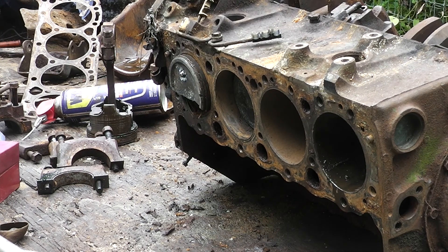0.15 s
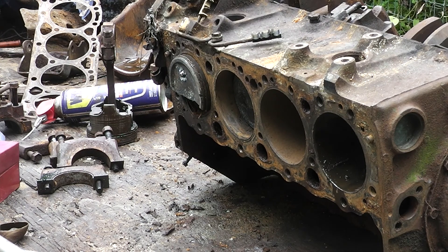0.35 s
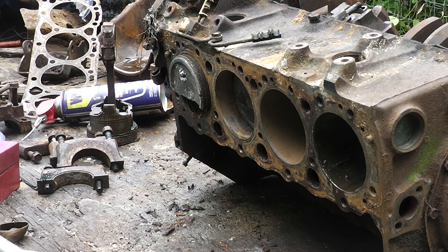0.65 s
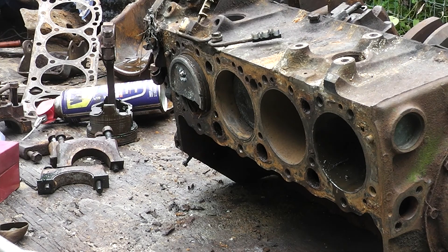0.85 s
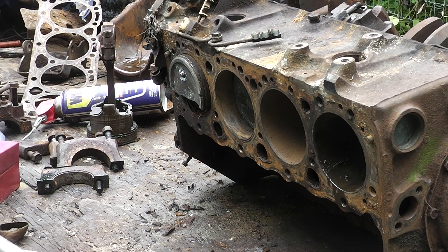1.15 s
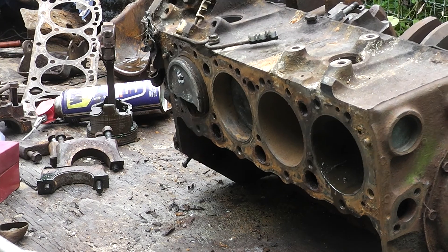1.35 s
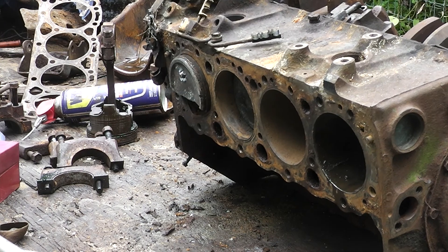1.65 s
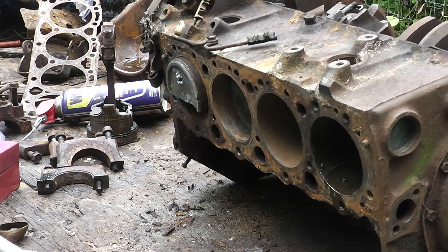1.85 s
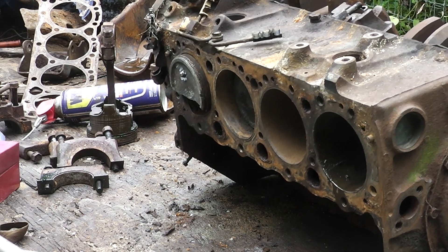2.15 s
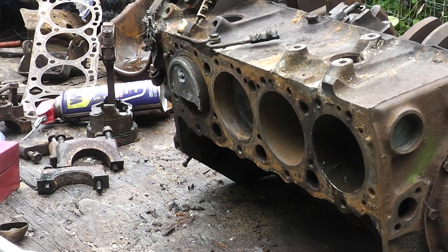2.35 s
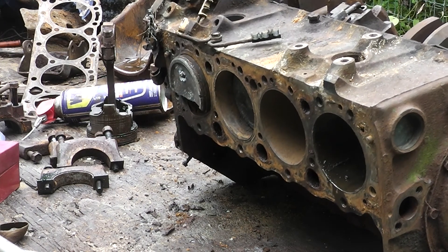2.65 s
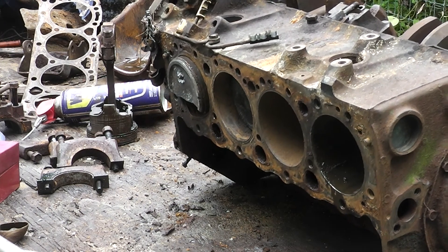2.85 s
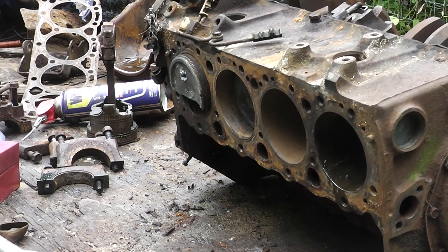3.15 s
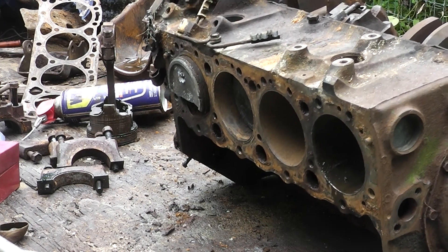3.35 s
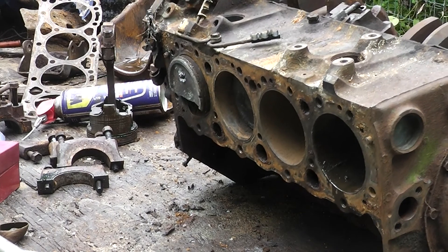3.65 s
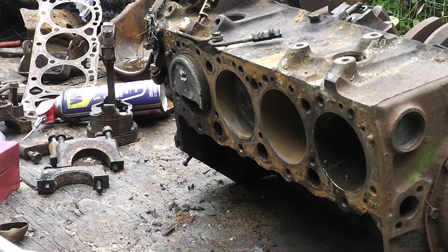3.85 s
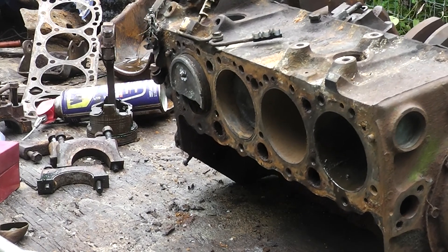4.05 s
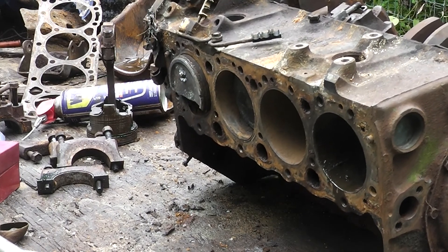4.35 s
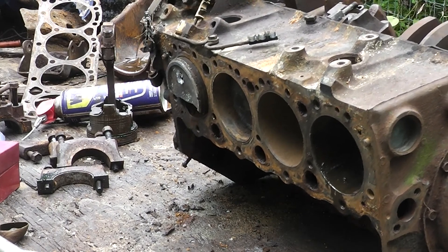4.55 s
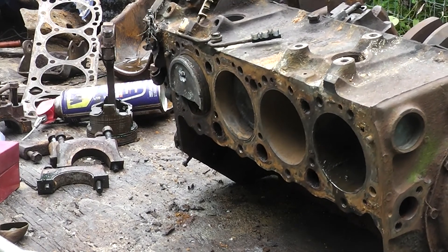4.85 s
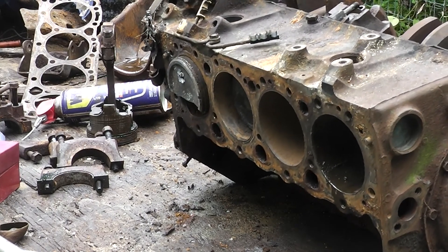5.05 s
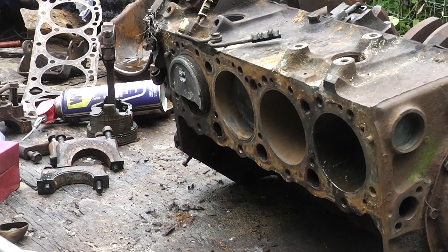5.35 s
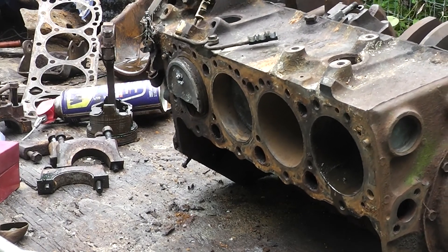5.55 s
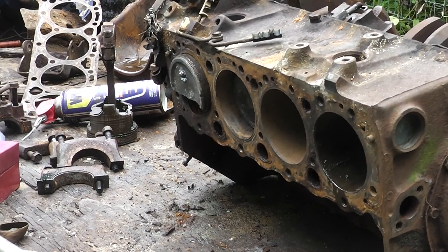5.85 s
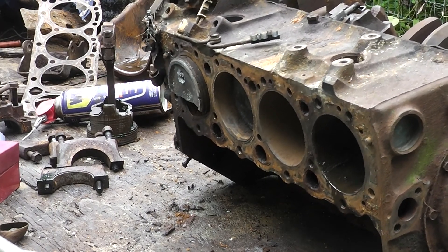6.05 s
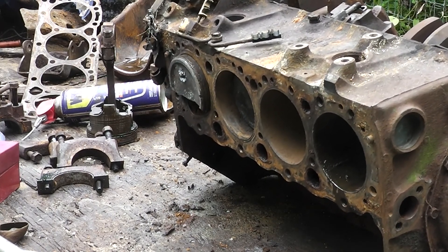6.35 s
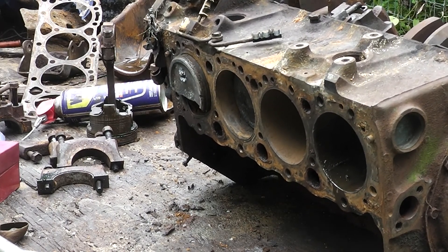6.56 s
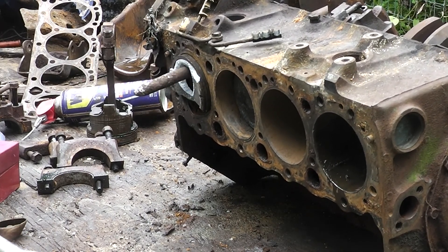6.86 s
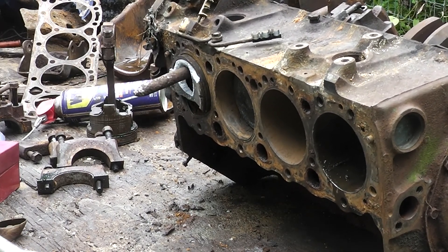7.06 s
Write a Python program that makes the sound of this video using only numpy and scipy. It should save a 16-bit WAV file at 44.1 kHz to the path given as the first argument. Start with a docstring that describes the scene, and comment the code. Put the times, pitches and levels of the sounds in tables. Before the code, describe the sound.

Eleven sharp, ringing hammer blows on a steel bar against a cast-iron engine block outdoors, ending with a freed piece pinging and crashing down.

```python
"""Eleven hammer blows drive a steel bar against a seized piston in a cast-iron engine block outdoors.
Each is a noise crack plus decaying modes of block, piston and bar, convolved with bench scatter and yard echo.
A sleeve rustles first, as noise in short strokes; the bar knocks in the bore, as short noise bursts.
The last blow frees a piece, which pings off a small part (modes) and crashes down (noise bursts and modes).
Gain control ducks the steady outdoor rumble, shaped noise, at every blow and lets it swell back."""
import sys
import numpy as np
from scipy import signal
from scipy.fft import rfft, irfft, next_fast_len
from scipy.io import wavfile
from scipy.ndimage import uniform_filter1d, minimum_filter1d

SR = 44100
rng = np.random.default_rng(int(sys.argv[2]) if len(sys.argv) > 2 else 0)


def output_pcm(signal):
    """Save a mono or channel-first signal as 16-bit PCM at the path in sys.argv[1].

    Samples are clipped to [-1, 1] before scaling.
    """
    pcm = np.clip(np.atleast_2d(signal).T, -1, 1) * 32767
    wavfile.write(sys.argv[1], SR, np.round(pcm).astype(np.int16))


N = 318402
TIME = np.arange(N) / SR   # seconds
AGE = np.arange(int(0.8 * SR)) / SR   # seconds since an onset; every struck sound is cut off at 0.8 s

# Spectra below give relative levels: noise() scales the result to rms 1.
# Outdoor rush. Each row: frequency in Hz, relative density in dB.
AIR_SPECTRUM = [(25, -10.5), (70, -11.5), (120, -14), (300, -11.5), (900, -16.5), (1700, -27.5),
                (2150, -40), (2600, -50), (3400, -52), (4500, -45), (6500, -49), (9600, -49.5),
                (14800, -58.5), (16000, -61.5)]
# Low outdoor drone. Each row: frequency in Hz, relative density in dB.
DRONE_SPECTRUM = [(45, -37.5), (66, -10), (76, -0.5), (86, -15), (110, -49.5), (400, -120)]
RUSH_DB, DRONE_DB = -61.0, -64.5   # rms before the gain control

# Strokes of the sleeve. Each row: start in seconds, length in seconds, level in dB before it eases off.
SLEEVE_STROKES = [(0.177, 0.082, -75.5), (0.366, .04, -87), (0.844, 0.041, -76.5), (0.907, .08, -72.5),
                  (0.995, 0.046, -73)]
STROKE_ATTACK_S, STROKE_SAG_DB_PER_S = 0.014, 49.5
STROKE_RELEASE_DB_PER_S = 201   # added to the sag once the stroke's length is over
# Friction of cloth, of a glancing touch and of grit. Each row: frequency in Hz, relative density in dB.
RUB_SPECTRUM = [(2000, -25.5), (4000, -7), (6000, -1), (10000, -1), (14000, -9), (16000, -18)]

# Hammer blows. Each row: start in seconds, force in dB, gain of the lows in dB, gain of the bar's ring in dB.
HAMMER_BLOWS = [(1.3261, -1.5, 0, -0.5), (1.8116, 0, 2.5, 0), (2.3083, 2, -2.5, -1), (2.851, 0, -0.5, -0.5),
                (3.3824, 1, -1.5, 0), (3.9127, -1, 1.5, 0), (4.4526, 2.5, -2, -1.5),
                (4.9922, 0.5, -2.5, -7), (5.5323, 3.5, -4, -12.5), (6.0808, 4, -5.5, -4),
                (6.645, 0.5, -8.5, -2.5)]
# Cast-iron block. Each row: nominal frequency in Hz, level midway through the blows in dB,
# decay time to -60 dB in seconds, change from first blow to last in dB as the piston works loose.
BLOCK_MODES = [(252, -24.5, 0.059, 2), (293, -33, 0.083, -5.5), (394, -34, 0.23, -1.5),
               (422, -30, 0.083, -0.5), (472, -31, .13, 1.5), (560, -24.5, 0.047, -2),
               (625.5, -25, 0.088, 1.5), (778, -38, 0.2, -3.5), (930, -31.5, .07, -0.5),
               (1128, -16.5, 0.055, 5.5), (1295, -27, 0.093, 0), (1388, -21.5, 0.065, 2),
               (1672, -21.5, 0.032, -1.5), (1818, -26, 0.089, 2), (1853, -30.5, 0.089, 4)]
# Steel bar, ringing free. Each row: nominal frequency in Hz, level midway through the blows in dB,
# decay time to -60 dB in seconds, change from first blow to last in dB.
BAR_MODES = [(2790, -65, 0.44, 7), (3060, -59, 0.39, -6), (3243, -52, 0.41, -7), (3790, -59, 0.48, -6),
             (4583, -52, 0.44, -4), (5423, -54, 0.43, -7), (5655, -50, 0.33, 12), (5711, -49, 0.3, 10),
             (6325, -56, 0.4, -5), (6494, -53, 0.39, 2), (7390, -53, 0.41, -8), (8375, -42, 0.3, 6),
             (8415, -41, 0.28, 3), (9570, -52, 0.39, -4), (10685, -55, 0.39, -1), (11182, -51, 0.33, -8),
             (11900, -55, 0.34, 2), (13110, -56, 0.31, -5), (13972, -59, 0.3, -9), (14415, -60, 0.29, -11)]
# Piston breaking loose. Each row: frequency in Hz, level in dB, decay time to -60 dB in seconds.
FREED_MODES = [(2800, -34.5, 0.15), (4540, -36, .18), (5650, -34.5, 0.2), (8387, -23.5, 0.19)]
PISTON_HZ, PISTON_FIRST_DB, PISTON_LAST_DB = 1195, -31, -23   # louder from first blow to last
LOWS_HZ, THUD_HZ, THUD_DB = 3000, 890, 1.6   # corner of each blow's own lows; the heavy block's lift
# Crack of a blow. Each row: frequency in Hz, relative density in dB.
CRACK_SPECTRUM = [(60, -14), (170, -16), (300, -4), (1300, 8.5), (2100, 1.5), (3000, -7), (4500, 3),
                  (7300, -3.5), (9000, 0.5), (11000, -3), (12500, -13), (15600, -13.5), (17000, -31)]
# Click of a blow and snap of the landing. Each row: frequency in Hz, relative density in dB.
SNAP_SPECTRUM = [(60, 5.5), (400, -17), (1300, 15.5), (2500, -7), (5000, 4), (10000, 3), (15000, -8.5),
                 (20000, -12.5)]
# Scatter off bench and nearby parts. Each row: frequency in Hz, relative density in dB.
BENCH_SPECTRUM = [(100, -12.5), (300, -8.5), (1300, -6.5), (1900, -1.5), (2700, 1), (4600, -1.5), (5800, 0),
                  (7500, -2.5), (8500, -5), (11000, -1.5), (12500, -1.5), (16000, -9.5)]
# Echo of the yard. Each row: frequency in Hz, relative density in dB.
YARD_SPECTRUM = [(100, -9), (400, 1.5), (1400, -3), (2600, -0.5), (3700, -1), (5400, 0), (7000, -3),
                 (10000, -7), (12500, -4.5), (14500, -10), (16000, -15)]

# Bar knocking about in the bore. Each row: start in seconds, level in dB.
BORE_KNOCKS = [(4.1, -48), (6.752, -37.5), (6.766, -49), (6.798, -45), (6.818, -45), (6.825, -40.5),
               (6.834, -46), (6.849, -55)]
# Colour of those knocks. Each row: frequency in Hz, relative density in dB.
KNOCK_SPECTRUM = [(120, -17), (300, -3), (470, 4), (750, -4), (1200, 2), (1700, -8.5), (2500, -23),
                  (6000, -35), (12000, -55), (16000, -40)]

# Small steel part touched in flight. Each row: frequency in Hz, relative level in dB,
# decay time to -60 dB in seconds.
PART_MODES = [(1750, -60.5, 0.51), (2520, -72, .3), (3380, -69, 0.34), (4320, -62, 0.23),
              (5300, -43, 0.093), (6400, -57, 0.32), (7838, -54, 0.12), (8940, -25, 0.12),
              (11440, -41, 0.11)]
PING_S, PING_DB = 6.8715, -2.5
LATE_DROP_S, LATE_DROP_DB, LATE_DROP_TAKES_S = 7.5, -4, 0.005   # after the ring has already faded

# Landed piece's own ring. Each row: frequency in Hz, level in dB, decay time to -60 dB in seconds.
PIECE_MODES = [(9850, -40, .16), (9960, -25, .13)]
# Clatter after the landing. Each row: frequency in Hz, relative density in dB.
CLATTER_SPECTRUM = [(88, -68), (150, -39), (291, -16), (321, -13.5), (361, -11), (589, -12.5), (871, -2.5),
                    (941, -10), (1060, -4.5), (2810, -32), (4860, -24.5), (8230, -28.5), (10000, -24),
                    (16000, -55)]
LANDING_S = 6.9388
SNAP_THIN_HZ, SNAP_THIN_DB = 3000, -4   # the light piece snaps with less body

# Stereo balance of the landing. Each row: frequency in Hz, left over right in dB.
LANDING_PAN = [(60, -13), (110, -14), (200, -3.0), (380, -1.5), (700, -2.5), (1290, 1.5), (2380, -1),
               (4400, 7.5), (8120, 0.5), (15000, 4.5)]
# Stereo balance of everything else but the reflections. Each row: frequency in Hz, left over right in dB.
BLOCK_PAN = [(100, -3.5), (400, -2.5), (1300, -2.5), (4400, 1), (8000, 0), (15000, 1)]
# Even stereo balance of the reflections. Each row: frequency in Hz, left over right in dB.
EVEN_PAN = [(100, 0), (10000, 0)]
# Stereo width of noise. Each row: frequency in Hz, side over mid in dB.
WIDTH = [(100, -21.5), (2000, -13.5), (5000, -9.5), (10000, -6), (14000, 2.5)]

BOOST_DB = 25.5   # the gain control's greatest boost
CUTOFF_HZ = 16600


def from_db(db):
    """Amplitude is ten to the power of the level over twenty."""
    return 10 ** (np.asarray(db) / 20)


def at_hz(points, hz):
    """Spectral curves are interpolated on a logarithmic frequency axis."""
    table_hz, value = np.transpose(points)
    return np.interp(np.log(np.maximum(hz, 1)), np.log(table_hz), value)


def panned(pan, hz):
    """Level difference between channels places a sound: half is given to each side."""
    return from_db(np.array([[0.5], [-0.5]]) * at_hz(pan, hz))


def noise(spectrum, size, pan=BLOCK_PAN):
    """Filtering white noise colours it; an uncorrelated side signal widens it. The rms is 1."""
    n = next_fast_len(size)
    hz = np.arange(n // 2 + 1) * SR / n
    mid, side = rfft(rng.standard_normal((2, n)))
    both = mid + side * from_db(at_hz(WIDTH, hz)) * [[1], [-1]]
    coloured = both * from_db(at_hz(spectrum, hz)) * panned(pan, hz)
    x = irfft(coloured, n)[:, :size]
    return x / x.std()


def outdoors():
    """Stationary noise: broadband gives a dull rush, a narrow band a wavering low drone."""
    rush = from_db(RUSH_DB) * noise(AIR_SPECTRUM, N)
    drone = from_db(DRONE_DB) * noise(DRONE_SPECTRUM, N)
    return rush + drone


def uneven(size, depth_db, count):
    """Smoothing white noise over `count` samples yields a slower random gain; its rms is 1."""
    jitter = uniform_filter1d(rng.standard_normal(size), size=count)
    gain = from_db(depth_db * jitter / jitter.std())
    return gain / np.sqrt(np.mean(gain ** 2))


def sleeve():
    """Sliding friction is a train of tiny uneven slips: strokes catch, ease off and let go."""
    power = 0
    for start_s, length_s, db in SLEEVE_STROKES:
        age = np.maximum(TIME - start_s, 0)
        overtime = np.maximum(age - length_s, 0)
        fall_db = STROKE_SAG_DB_PER_S * age + STROKE_RELEASE_DB_PER_S * overtime
        attack = np.minimum(age / STROKE_ATTACK_S, 1)
        power = power + (attack * from_db(db - fall_db)) ** 2
    return np.sqrt(power) * noise(RUB_SPECTRUM, N) * uneven(N, depth_db=3.5, count=130)


def dying(t60):
    """Linear damping gives exponential decay, 60 dB in t60 seconds."""
    return from_db(-60 * AGE / t60)


def burst(spectrum, level_db, t60, rise, pan=BLOCK_PAN):
    """Countless overlapping modes behave as noise that builds up (rise in seconds) and dies."""
    build_up = 1 - np.exp(-AGE / rise)
    return from_db(level_db) * noise(spectrum, len(AGE), pan) * dying(t60) * build_up


def ring(modes, scatter_db, detune):
    """Modal superposition: the contact point alters each mode's strength and, slightly, its pitch."""
    out = 0
    draws = rng.standard_normal((len(modes), 3))
    for (hz, db, t60), (strength, shift, sign) in zip(modes, draws):
        phase = 2 * np.pi * hz * (1 + detune * shift) * AGE
        wave = np.sign(sign) * np.sin(phase) * dying(t60)
        out = out + from_db(db + scatter_db * strength) * panned(BLOCK_PAN, hz) * wave
    return out


def low_shelf(x, corner_hz, gain_db):
    """A second-order shelf raises or lowers everything under its corner."""
    w, g = 2 * np.tan(np.pi * corner_hz / SR), from_db(gain_db / 2)
    zeros = [1, np.sqrt(2 * g) * w, g * w * w]
    poles = [1, np.sqrt(2 / g) * w, w * w / g]
    b, a = signal.bilinear(zeros, poles)
    return signal.lfilter(b, a, x)


def loosened(modes, progress):
    """Boundary conditions set modal strength: levels shift as the piston moves (progress 0-1)."""
    return [(hz, db + change_db * (progress - 0.5), t60) for hz, db, t60, change_db in modes]


def surroundings(x):
    """Reflection as convolution: quick scatter off the bench and the fainter, longer yard echo."""
    bench = burst(BENCH_SPECTRUM, level_db=-37.0, t60=0.15, rise=0.0018, pan=EVEN_PAN)
    yard = burst(YARD_SPECTRUM, level_db=-56.5, t60=0.57, rise=0.015, pan=EVEN_PAN)
    return x + signal.fftconvolve(x, bench + yard, axes=1)[:, :len(AGE)]


def add(out, start_s, sound):
    """Superposition: mix a sound in from its start."""
    i = int(start_s * SR)
    out[:, i:i + sound.shape[-1]] += sound[..., :N - i]


def bar_ring(progress):
    """Contact damping: pressed to the piston the bar rings briefly; rebounding, it rings on and beats."""
    modes = loosened(BAR_MODES, progress)
    pressed = from_db(17.5) * dying(0.15) * ring(modes, scatter_db=1.5, detune=0.006)
    # two slightly detuned copies of each mode beat together
    pairs = ring(modes, scatter_db=1.0, detune=0.00081) + ring(modes, scatter_db=2.0, detune=0.0018)
    free = from_db(-1.0) * pairs
    return low_shelf(pressed + free, 5800, -2.7)   # a hard contact favours the high modes


def hammering():
    """Impact excitation: each blow clicks, cracks and rings block, piston and bar; the last frees the piston."""
    out = np.zeros((2, N))
    # the same dense modes answer every blow
    casting = burst(CRACK_SPECTRUM, level_db=-15, t60=0.04, rise=0.00025)
    steps = np.linspace(0, 1, len(HAMMER_BLOWS))
    for progress, (start_s, force_db, lows_db, bar_db) in zip(steps, HAMMER_BLOWS):
        click = burst(SNAP_SPECTRUM, level_db=-12.5, t60=0.0062, rise=0.00025)
        crack = casting + burst(CRACK_SPECTRUM, level_db=-10.5, t60=0.04, rise=0.00098)
        block = from_db(-0.5) * ring(loosened(BLOCK_MODES, progress), scatter_db=0.5, detune=0.0052)
        piston_db = PISTON_FIRST_DB + progress * (PISTON_LAST_DB - PISTON_FIRST_DB)
        piston = ring([(PISTON_HZ, piston_db, 0.16)], scatter_db=1.0, detune=0.0059)
        bar = from_db(bar_db) * bar_ring(progress)
        blow = low_shelf(click + crack + block + piston + bar, LOWS_HZ, lows_db)
        blow = low_shelf(blow, THUD_HZ, THUD_DB)
        add(out, start_s, from_db(force_db) * surroundings(blow))
    freed = ring(FREED_MODES, scatter_db=0, detune=0)
    add(out, HAMMER_BLOWS[-1][0], surroundings(freed))
    return out


def bar_knocks():
    """Weak collisions: the bar knocks in the bore, each contact a short dull burst of noise."""
    out = np.zeros((2, N))
    for start_s, db in BORE_KNOCKS:
        add(out, start_s, burst(KNOCK_SPECTRUM, db, t60=0.1, rise=0.0015))
    return out


def part_ping():
    """Glancing contact: the flying piece brushes a small steel part, whose modes build up and ring."""
    out = np.zeros((2, N))
    touch = burst(RUB_SPECTRUM, level_db=-42, t60=0.025, rise=0.0005)
    part = ring(PART_MODES, scatter_db=0, detune=0)
    build_up = 1 - np.exp(-AGE / 0.0013)
    add(out, PING_S, touch + part * build_up)
    dropped = np.clip((TIME - LATE_DROP_S) / LATE_DROP_TAKES_S, 0, 1)
    return from_db(PING_DB + LATE_DROP_DB * dropped) * out


def landing():
    """Impact and friction: the piece lands with a snap, scraped grit, uneven clatter and its own ring."""
    out = np.zeros((2, N))
    snap = burst(SNAP_SPECTRUM, level_db=-5, t60=0.0087, rise=0.0002, pan=LANDING_PAN)
    snap = low_shelf(snap, SNAP_THIN_HZ, SNAP_THIN_DB)
    grit = burst(RUB_SPECTRUM, level_db=-16.5, t60=0.099, rise=0.0024, pan=LANDING_PAN)
    clatter = burst(CLATTER_SPECTRUM, level_db=-23.5, t60=0.38, rise=0.0071, pan=LANDING_PAN)
    clatter = clatter * uneven(len(AGE), depth_db=1.0, count=200)
    piece = ring(PIECE_MODES, scatter_db=0, detune=0)
    add(out, LANDING_S, snap + grit + clatter + piece)
    return out


def scene():
    """Superposition of all that reaches the microphone."""
    return outdoors() + sleeve() + hammering() + bar_knocks() + part_ping() + landing()


def gain_control(x, ceiling_db, hold_s, release_db_per_s):
    """Peak limiting: treble peaks pull the gain down at once; it waits, then climbs to full boost."""
    slope = np.diff(x, prepend=0)   # differencing favours the treble
    power = uniform_filter1d(slope ** 2, size=90).max(axis=0)
    allowed_db = np.minimum(ceiling_db - 10 * np.log10(np.maximum(power, 1e-12)), BOOST_DB)
    climb = release_db_per_s * TIME
    released = np.minimum.accumulate(allowed_db - climb) + climb
    hold = 2 * int(hold_s * SR / 2) + 1
    held = minimum_filter1d(released, hold, origin=hold // 2, mode="nearest")
    # a short look-ahead has the gain down before the peak arrives
    early = minimum_filter1d(held, size=101)
    return x * from_db(uniform_filter1d(early, size=61))


def record(dry):
    """Gain control, soft saturation that rounds the peaks, and a steep low-pass filter."""
    x = gain_control(dry, ceiling_db=-14.0, hold_s=0.14, release_db_per_s=43)
    top_cut = signal.cheby2(14, 70, CUTOFF_HZ + 700, fs=SR, output="sos")
    return signal.sosfilt(top_cut, np.tanh(x))


dry = scene()
out = record(dry)
output_pcm(out)
```